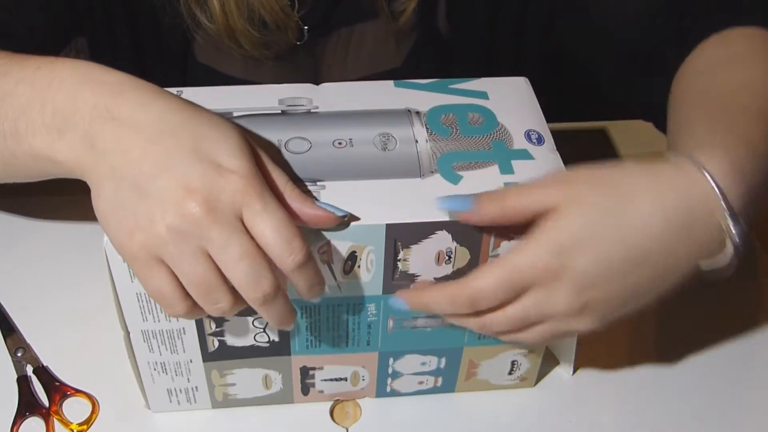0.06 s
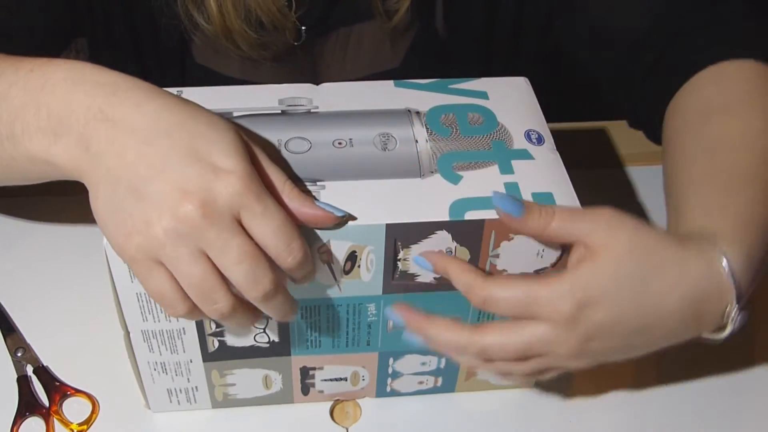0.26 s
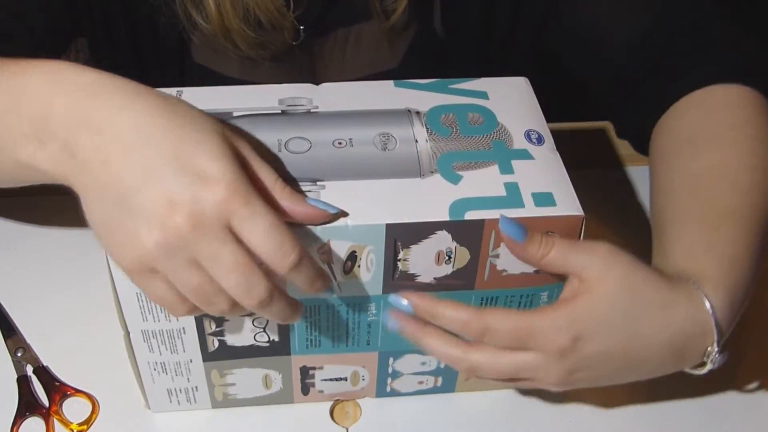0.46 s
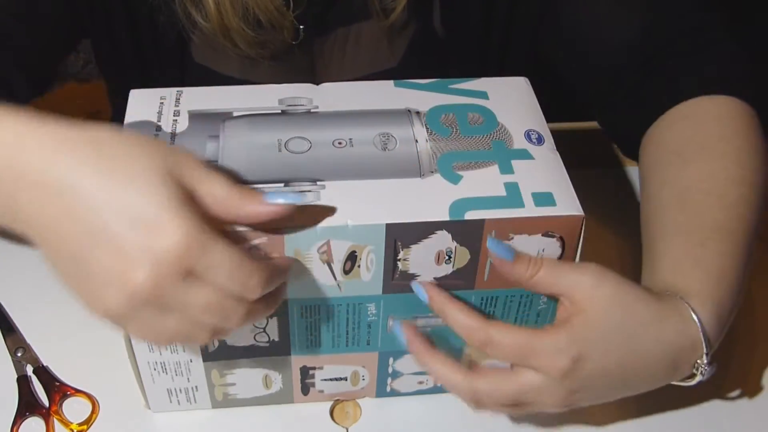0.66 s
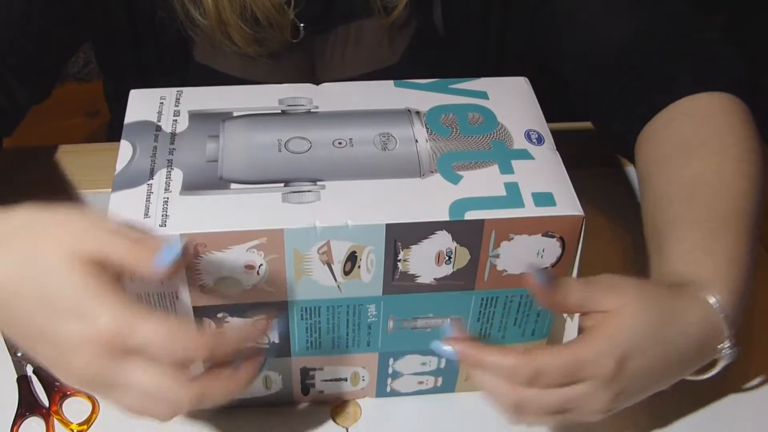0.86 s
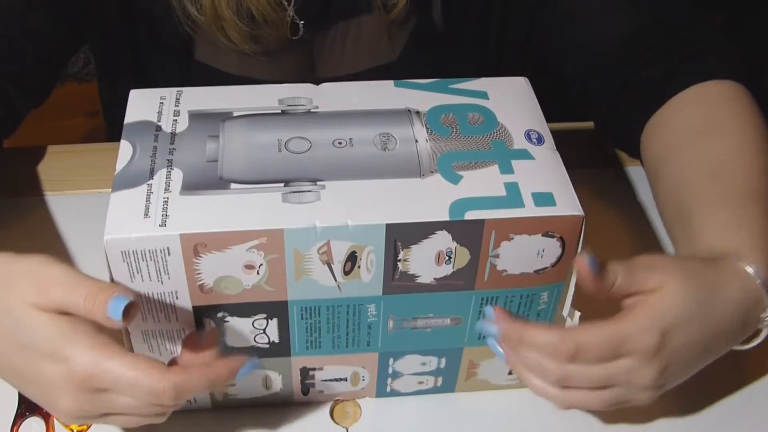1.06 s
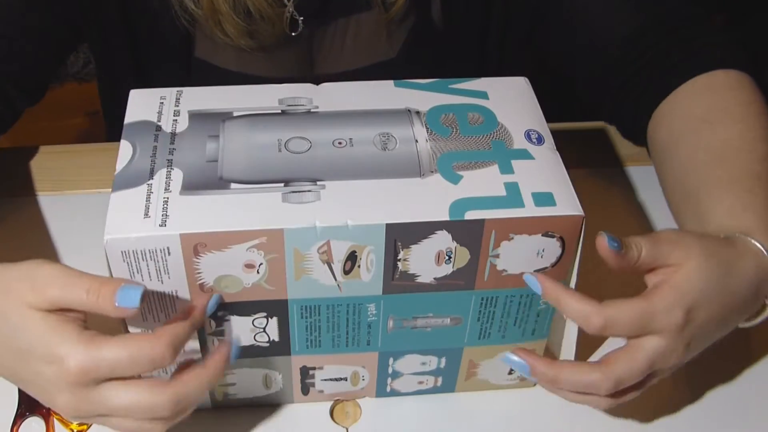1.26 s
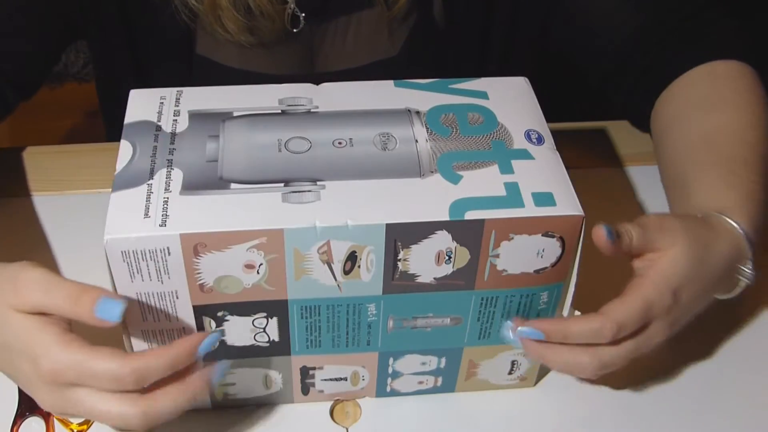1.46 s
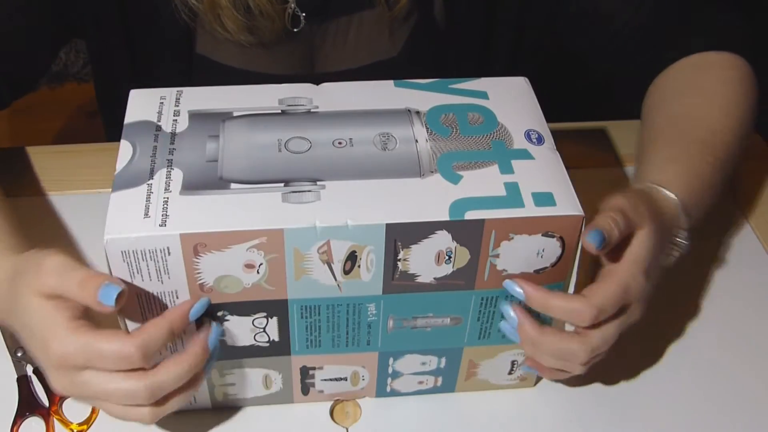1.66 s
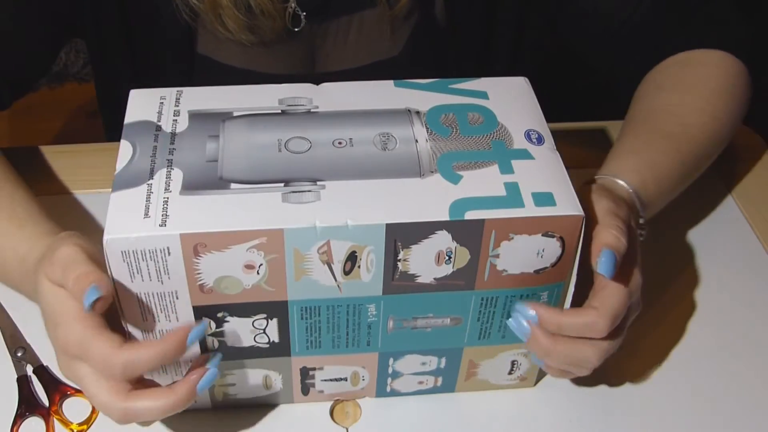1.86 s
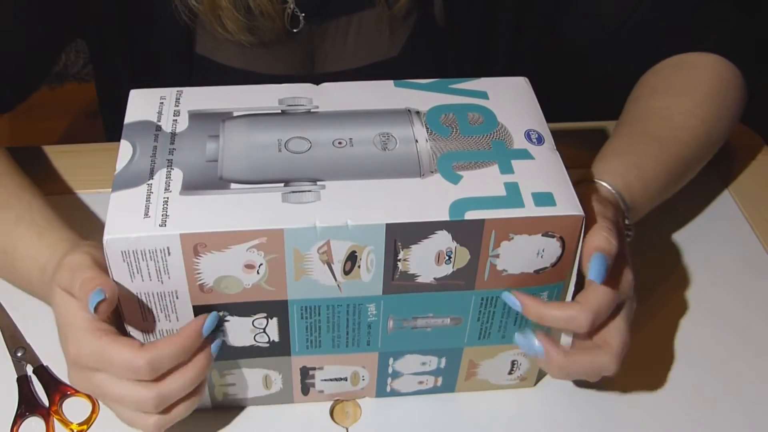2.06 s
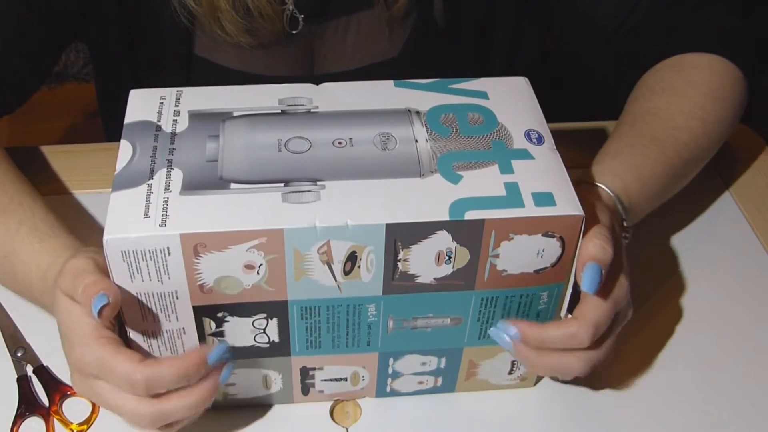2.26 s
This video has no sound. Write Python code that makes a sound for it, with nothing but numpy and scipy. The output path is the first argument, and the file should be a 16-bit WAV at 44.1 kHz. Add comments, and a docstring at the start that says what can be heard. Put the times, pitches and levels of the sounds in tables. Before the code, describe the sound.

Close to the microphone in a quiet room, fingernails drum irregularly on a cardboard box. The crisp clicks and short hollow thumps pause briefly for a faint brush of the hand, then resume with light nail scrapes between them.

```python
"""Fingernails on a cardboard box.

Long nails drum on the sides of a box, close to a stereo microphone in a small quiet room.
Each main tap is a hard nail click, a dry knock of the card and a short hollow wall thump, which
also rings the box. Every spot rings briefly at its own pitch. In between, the nails slide lightly
over the card or give a few faint, very brief taps, and a hand brushes the lid."""
import sys
import numpy as np
from scipy import signal
from scipy.fft import rfft, irfft, next_fast_len
from scipy.io import wavfile
from scipy.ndimage import uniform_filter1d

SR = 44100
rng = np.random.default_rng(int(sys.argv[2]) if len(sys.argv) > 2 else 0)


def master_out(mix):
    """Clip the mix to full scale and print it as 16-bit PCM to the path in sys.argv[1]."""
    frames = np.transpose(np.atleast_2d(mix))
    ceiling = np.clip(frames, -1, 1)
    pcm = np.round(ceiling * 32767).astype(np.int16)
    wavfile.write(sys.argv[1], SR, pcm)


N = 102488

# Nail taps. Each row: start in seconds, thump in dB, thump pitch in Hz, card knock in dB,
# card crack in dB, spot pitch in Hz, spot ring in dB, nail click in dB, nail edge in dB.
TAP_EVENTS = [ (0.0136, -51, 330, -46, -44.5, 1890, -58, -44.5, -50.5),
              (0.0343, -43.5, 292, -41.5, -36, 1600, -46.5, -34, -42),
              (0.245, -55, 321, -45.5, -47.5, 2040, -49, -44.5, -47),
              (0.2511, -45.5, 320, -42.5, -40, 1650, -37.5, -34, -39),
              (0.4536, -48.5, 248, -47, -52.5, 1830, -48, -49.5, -58.5),
              (0.5172, -63, 370, -43, -43.5, 2920, -35.5, -39.5, -43.5),
              (0.5804, -42, 266, -44.5, -41.5, 2570, -42.5, -37, -42),
              (0.6665, -46.5, 313, -45.5, -45, 1640, -43, -40, -48),
              (.683, -58, 318, -47.5, -41.5, 810, -43.5, -40, -44),
              (1.0812, -54, 350, -53, -50.5, 1700, -55, -47.5, -60.5),
              (1.1745, -47, 286, -42.5, -41, 2110, -50, -40.5, -52.5),
              (1.298, -44.5, 294, -42, -43, 1770, -38, -33.5, -38),
              (1.433, -51.5, 340, -52.5, -56, 2750, -54.5, -46, -52.5),
              (1.4942, -44, 341, -40.5, -39.5, 2090, -46.5, -38, -40.5),
              (1.6331, -51.5, 339, -48, -48.5, 2140, -52.5, -48.5, -56.5),
              (1.6852, -39, 354, -39.5, -41, 2110, -39.5, -34.5, -38),
              (1.717, -41, 332, -41.5, -45, 3360, -39, -31, -38),
              (1.9105, -53.5, 334, -50.5, -49, 2830, -48, -43.5, -47.5),
              (1.981, -42, 321, -43.5, -44, 2770, -46, -35, -41),
              (2.0918, -49, 295, -42, -38.5, 2130, -42.5, -36.5, -43),
              (2.113, -46, 338, -45.5, -44.5, 2740, -45, -38, -43),
              (2.149, -47.5, 282, -41, -39, 1694, -38.5, -36, -41),
              (2.3057, -50.5, 340, -49.5, -49, 2220, -51, -41, -50)]
# Spectra of the nail's click and bright edge. Each row: frequency in Hz, gain in dB.
CLICK_SPECTRUM = [(2100, -25), (2800, -6), (3300, -4), (3750, 3), (4150, 1), (4650, -10), (9000, -42.5)]
EDGE_SPECTRUM = [(3000, -47), (4500, 2.5), (5400, 0.5), (7200, -2.5), (8200, -10.5), (9500, -13.5),
                 (13500, -14.5), (16000, -59)]
# Spectra of the card's crack and knock. Each row: frequency in Hz, gain in dB.
CRACK_SPECTRUM = [(1380, -29), (1530, 1), (2150, -3), (2750, -5), (4000, -28)]
KNOCK_SPECTRUM = [(200, -23), (430, -9), (510, 1), (590, -6.5), (720, -1), (860, -3), (1000, 0), (1270, -1),
                  (1420, -4.5), (2500, -33.5)]
# Box modes. Each row: frequency in Hz, level in dB re the tap's knock, T60 in seconds,
# antiphase share from 0 to 1.
BOX_MODES = [(151.3, -15.5, 0.41, 0.34), (221.2, -13.5, 0.092, 0), (376.4, -10, 0.098, 0.16),
             (467, -12, 0.099, 0.74), (639.5, -12, 0.041, 0.38), (1247, -16, 0.062, 0)]
# Nail slides and a few faint, very brief nail taps.
# Each row: start in seconds, length in seconds, level in dB.
LIGHT_CONTACTS = [(0.193, 0.06, -64), (0.4, .035, -63), (0.5, 0.0092, -55), (.612, 0.08, -58),
                  (0.682, 0.085, -55), (0.77, 0.039, -52), (1.072, 0.11, -60.5), (1.253, 0.051, -60.5),
                  (1.6054, 0.0044, -48.5), (1.81, 0.061, -55), (1.866, 0.0079, -49), (1.973, .009, -54),
                  (2.045, 0.052, -55.5), (2.204, 0.047, -60), (2.2765, 0.0056, -50.5)]
# Spectrum of these light contacts. Each row: frequency in Hz, gain in dB.
LIGHT_CONTACT_SPECTRUM = [(200, -42), (800, 4), (1700, 5.5), (2900, 4.5), (3900, 10), (4900, 5.5),
                          (7500, -6), (16000, -31)]
# Room decay. Each row: frequency in Hz, T60 in seconds.
ROOM_DECAY = [(150, 0.36), (4000, 0.23), (15000, 0.33)]
# Spectra of the reflections and the noise floor. Each row: frequency in Hz, gain in dB.
ROOM_SPECTRUM = [(100, -5.5), (420, -6), (600, 1), (2000, -2.5), (4000, -1.5), (6500, -1), (9500, 6.5),
                 (15000, -10)]
FLOOR_SPECTRUM = [(20, -8.5), (140, -6.5), (1100, -5.5), (2600, -15.5), (11000, -22), (16000, -32)]
# Stereo width. Each row: frequency in Hz, side gain in dB.
STEREO_WIDTH = [(100, -13), (300, -3), (500, -1.5), (1000, 3), (2000, -8.5), (9000, -9.5)]

LEAD_S, CLICK_LAG_S = 0.0012, 0.0005  # contact build-up; click delay after the edge
NAIL_RISE_S, CARD_RISE_S = 0.0003, 0.00027
TAP_SAMPLES = 8192
TAP_TIME_S = np.arange(TAP_SAMPLES) / SR
BIN_HZ = np.fft.rfftfreq(TAP_SAMPLES, 1 / SR)


def taps(low_cut_hz=135):
    """Nails strike the card; the wall thumps, box and spot ring. The deep bass is cut away."""
    out = np.zeros((2, N))
    for start_s, thump_db, thump_hz, knock_db, crack_db, spot_hz, spot_db, click_db, edge_db in TAP_EVENTS:
        add(out, start_s - LEAD_S + CLICK_LAG_S, nail_click(click_db))
        add(out, start_s - LEAD_S, nail_edge(edge_db) + card_knock(crack_db, knock_db))
        thump = amp(thump_db) * mode(thump_hz, t60_s=0.036, attack_s=0.0054)
        ring = amp(knock_db) * box_ring(scatter_db=2.5)
        spot = amp(spot_db) * mode(spot_hz, t60_s=0.011, attack_s=NAIL_RISE_S)
        add(out, start_s, thump + ring + spot)
    return signal.lfilter(*signal.butter(4, low_cut_hz, 'highpass', fs=SR), out)


def nail_click(level_db):
    """The hard nail clicks on impact."""
    gain = amp(along(CLICK_SPECTRUM, BIN_HZ))
    return amp(level_db) * burst(gain, NAIL_RISE_S, t60_s=0.009, side_db=-6.5)


def nail_edge(level_db):
    """Treble of the nail contact; lighter taps are duller."""
    corner_hz = 49000 * amp(0.29 * level_db)
    gain = amp(along(EDGE_SPECTRUM, BIN_HZ)) / (1 + (BIN_HZ / corner_hz) ** 2)
    return amp(level_db) * burst(gain, NAIL_RISE_S, t60_s=0.017, side_db=-3)


def card_knock(crack_db, knock_db):
    """Struck card: a crack over a lower, dry knock."""
    crack_gain = amp(along(CRACK_SPECTRUM, BIN_HZ)) / (1 + (BIN_HZ / 5000) ** 4)
    knock_gain = amp(along(KNOCK_SPECTRUM, BIN_HZ)) / (1 + (BIN_HZ / 3000) ** 4)
    crack = amp(crack_db) * burst(crack_gain, CARD_RISE_S, t60_s=0.026, side_db=-4)
    knock = amp(knock_db - 1) * burst(knock_gain, CARD_RISE_S, t60_s=0.034, side_db=-22)
    return crack + knock


def box_ring(scatter_db):
    """Box modes, at new strengths for each spot struck."""
    ring = np.zeros((2, TAP_SAMPLES))
    for hz, db, t60_s, antiphase in BOX_MODES:
        wave = signal.hilbert(mode(hz, t60_s, attack_s=0.0043))
        wave *= amp(db + scatter_db * rng.standard_normal())
        ring += stereo([np.sqrt(1 - antiphase) * wave.real, np.sqrt(antiphase) * wave.imag], 0)
    return ring


def burst(gain, rise_s, t60_s, side_db):
    """Brief rough contact: a noise pulse through a minimum-phase filter."""
    cepstrum = irfft(np.log(np.maximum(gain, 1e-4)))
    cepstrum[1:TAP_SAMPLES // 2] *= 2
    cepstrum[TAP_SAMPLES // 2 + 1:] = 0
    t = TAP_TIME_S - LEAD_S
    envelope = fade(np.maximum(t, 0), t60_s) * np.exp(np.minimum(t, 0) / rise_s)
    force = rfft(rng.standard_normal((2, TAP_SAMPLES)) * envelope)
    force /= np.sqrt(np.abs(force) + 1e-9)  # partly flatten the spectrum
    pair = irfft(force * np.exp(rfft(cepstrum))) * (TAP_TIME_S < TAP_TIME_S[-1] / 2)
    return stereo([unit_energy(x) for x in pair], side_db)


def mode(hz, t60_s, attack_s):
    """One damped vibration, random phase."""
    wave = np.sin(2 * np.pi * (hz * TAP_TIME_S + rng.random()))
    return unit_energy(wave * fade(TAP_TIME_S, t60_s) * (1 - np.exp(-TAP_TIME_S / attack_s)))


def slides_and_faint_taps(roughness=0.42):
    """Nails catch on the card's grain in tiny slips; a few very brief contacts are faint taps."""
    pressure = np.zeros(N)
    for start_s, length_s, db in LIGHT_CONTACTS:
        add(pressure, start_s, amp(db) * signal.windows.tukey(round(length_s * SR), 0.5))
    slips = np.exp(roughness * unit_rms(uniform_filter1d(rng.standard_normal(N), size=50)))
    contact = colour(rng.standard_normal((2, N)) * slips, LIGHT_CONTACT_SPECTRUM)
    return pressure * stereo(unit_rms(contact), side_db=-5)


def hand_rub(start_s=0.57, length_s=0.39, level_db=-68, low_cut_hz=9000):
    """Skin brushes the smooth lid: an airy hiss that swells and fades."""
    out = np.zeros((2, N))
    noise = rng.standard_normal((2, round(length_s * SR)))
    hiss = signal.lfilter(*signal.butter(2, low_cut_hz, 'highpass', fs=SR), noise)
    add(out, start_s, amp(level_db) * unit_rms(hiss) * signal.windows.tukey(hiss.shape[1], 0.5))
    return out


def room(source, near_db=-10, tail_db=-9.5, near_delay_s=0.003, tail_rise_s=0.011):
    """Quick reflections off table and arms, then the room's tail; each spot has its own response."""
    out = np.zeros((2, N))
    t = np.arange(SR // 2) / SR
    cuts = [0] + [round(tap[0] * SR) for tap in TAP_EVENTS[1:]] + [N]
    for start, end in zip(cuts, cuts[1:]):
        hz, frame_s, spectra = signal.stft(rng.standard_normal((2, len(t))), SR, nperseg=256)
        spectra *= fade(frame_s, along(ROOM_DECAY, hz)[:, None])
        tail = signal.istft(spectra, SR, nperseg=256)[1][:, :len(t)]
        tail *= np.clip(t / tail_rise_s, 0, 1)
        near = rng.standard_normal((2, len(t))) * fade(t, t60_s=0.057) * (t > near_delay_s)
        response = amp(tail_db) * stereo(tail / np.linalg.norm(tail[0]), side_db=1.5)
        response += amp(near_db) * stereo(near / np.linalg.norm(near[0]), side_db=3)
        add(out, start / SR, signal.fftconvolve(source[None, start:end], response, axes=1))
    return colour(out, ROOM_SPECTRUM)


def room_tone(mid_db=-63):
    """Faint steady air and microphone hiss."""
    noise = colour(rng.standard_normal((2, N)), FLOOR_SPECTRUM)
    return amp(mid_db) * stereo(unit_rms(noise), side_db=7)


def amp(db):
    """Decibels to gain."""
    return 10 ** (np.asarray(db) / 20)


def unit_rms(x):
    """Scale to rms 1."""
    return x / np.sqrt(np.mean(x ** 2) + 1e-20)


def unit_energy(x, hold_s=0.01):
    """Scale to the energy of rms 1 held for hold_s."""
    return x * np.sqrt(hold_s * SR / (np.sum(x ** 2) + 1e-20))


def along(points, hz):
    """Interpolate (Hz, value) points on a log axis."""
    point_hz, values = np.transpose(points)
    return np.interp(np.log(hz + 1), np.log(point_hz + 1), values)


def fade(t, t60_s):
    """Exponential decay."""
    return np.exp(-np.log(1000) * t / t60_s)


def colour(x, points):
    """Filter by a (Hz, dB) curve."""
    size = next_fast_len(x.shape[-1] + TAP_SAMPLES)
    gain = amp(along(points, np.fft.rfftfreq(size, 1 / SR)))
    return irfft(rfft(x, size) * gain, size)[..., :x.shape[-1]]


def stereo(pair, side_db):
    """Mid and side to left and right."""
    side = amp(side_db) * pair[1]
    return np.array([pair[0] + side, pair[0] - side])


def add(out, start_s, x):
    """Mix x in at start_s."""
    part = out[..., max(round(start_s * SR), 0):][..., :x.shape[-1]]
    part += x[..., :part.shape[-1]]


def scene():
    """Box, reflections and room tone; narrow in the bass, widest near 1 kHz."""
    box = taps() + slides_and_faint_taps() + hand_rub()
    left, right = box + room(box.mean(0)) + room_tone()
    return stereo([(left + right) / 2, colour((left - right) / 2, STEREO_WIDTH)], 0)


def record(dry, top_hz=16000):
    """Steep low-pass at the recorder's band limit."""
    size = next_fast_len(N + TAP_SAMPLES)
    hz = np.fft.rfftfreq(size, 1 / SR)
    return irfft(rfft(dry, size) / (1 + (hz / top_hz) ** 120), size)[:, :N]


dry = scene()
out = record(dry)
master_out(out)
```